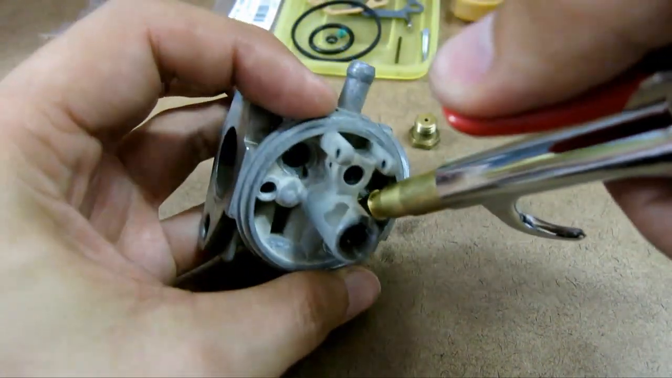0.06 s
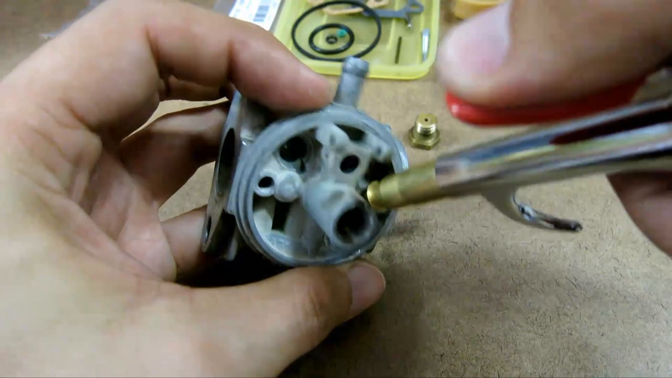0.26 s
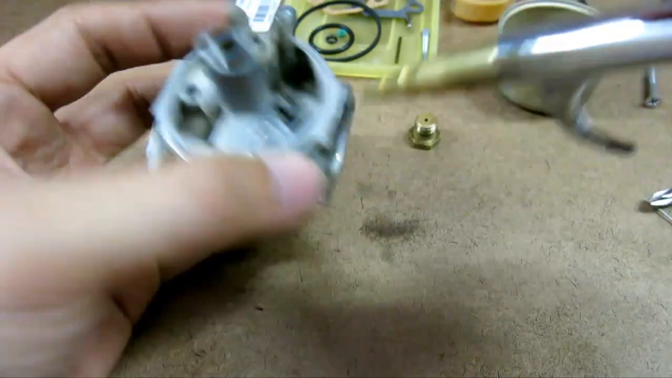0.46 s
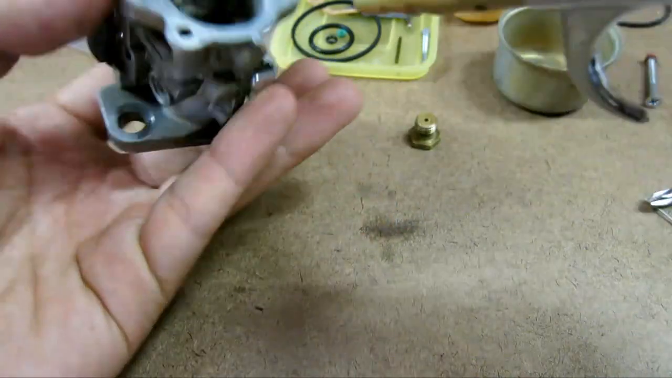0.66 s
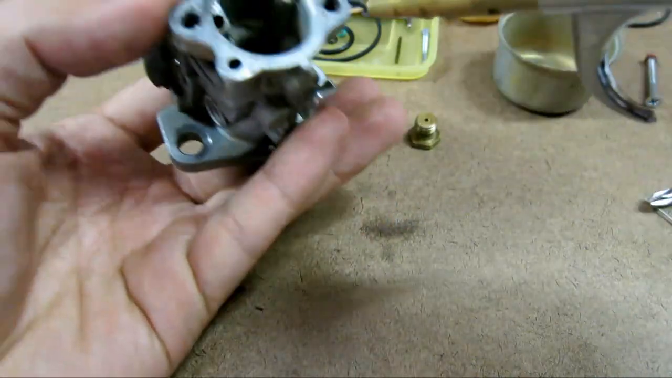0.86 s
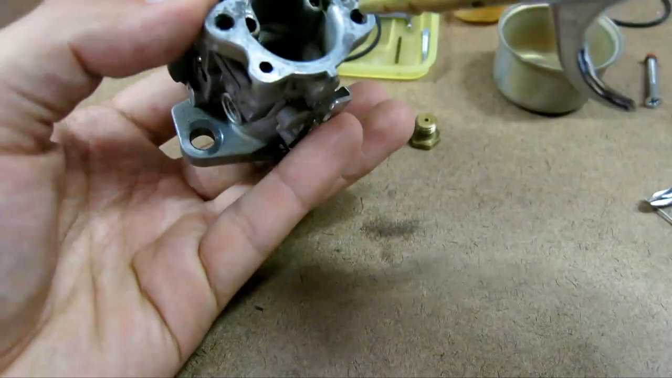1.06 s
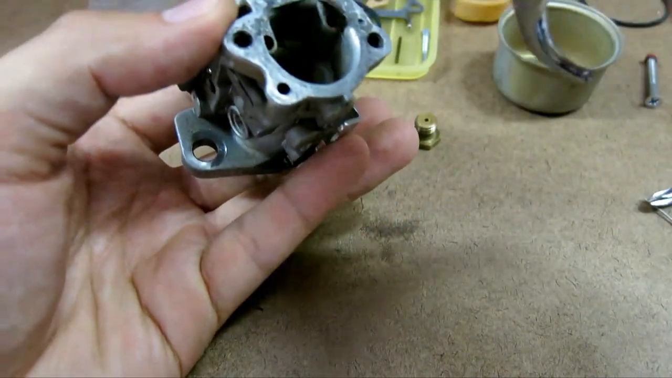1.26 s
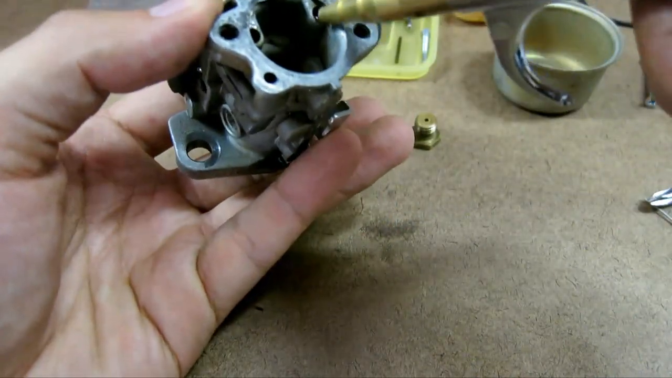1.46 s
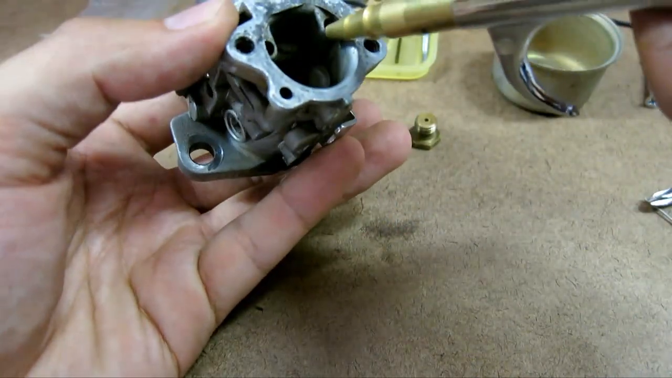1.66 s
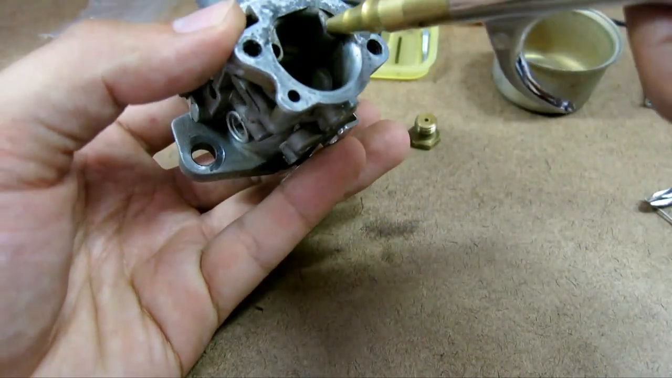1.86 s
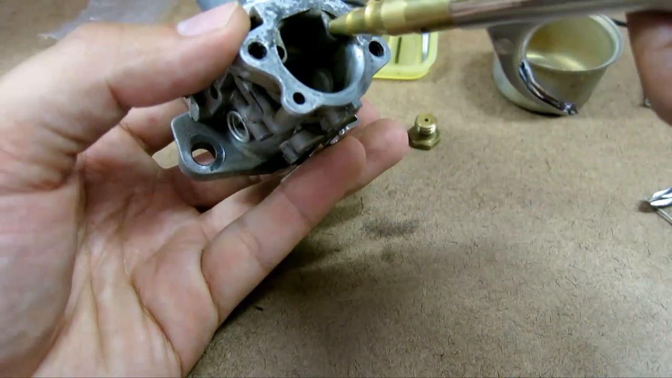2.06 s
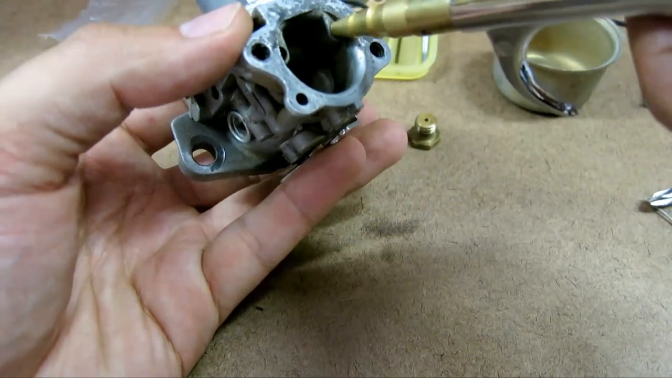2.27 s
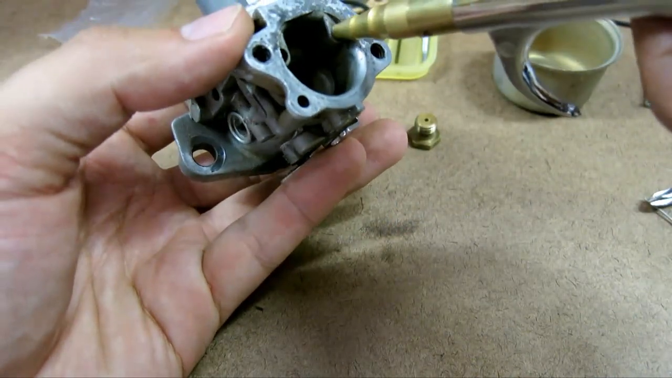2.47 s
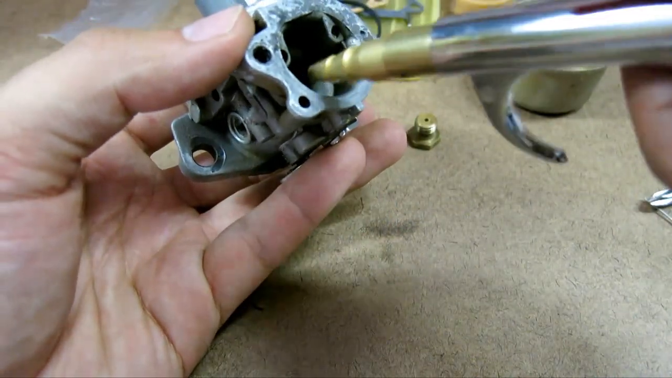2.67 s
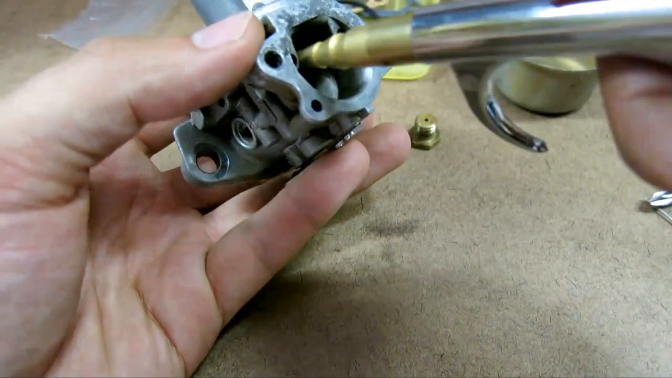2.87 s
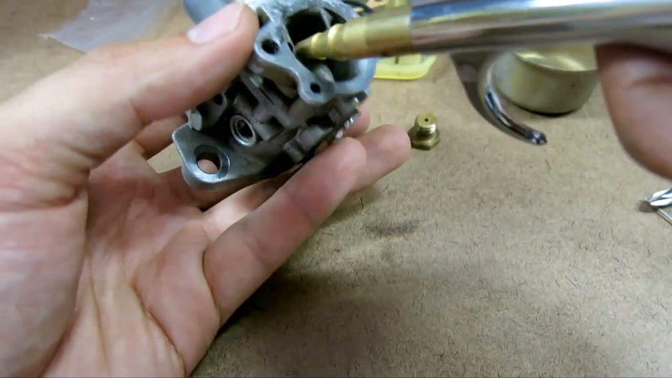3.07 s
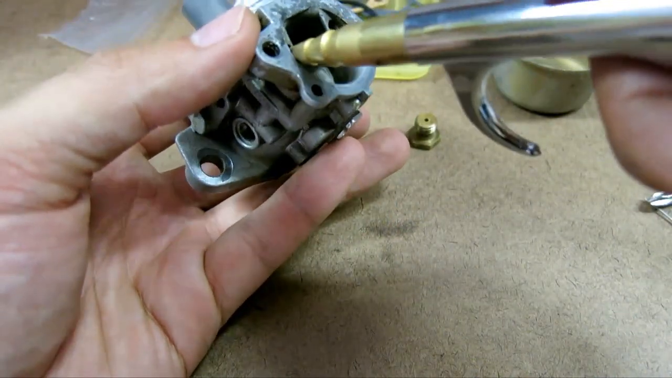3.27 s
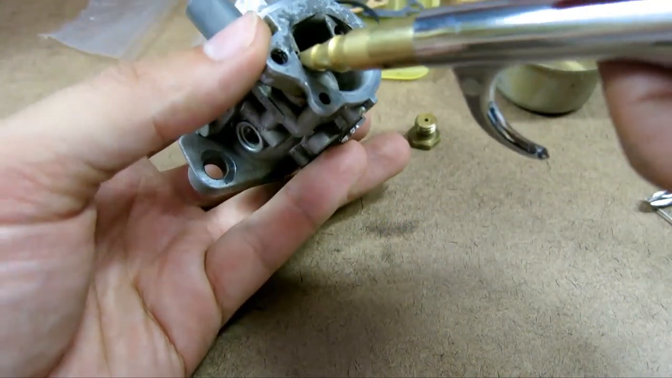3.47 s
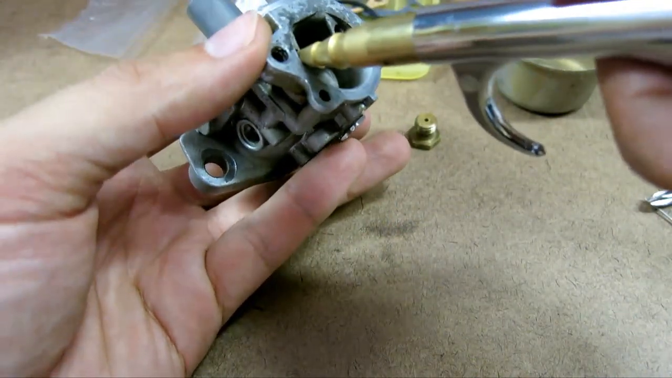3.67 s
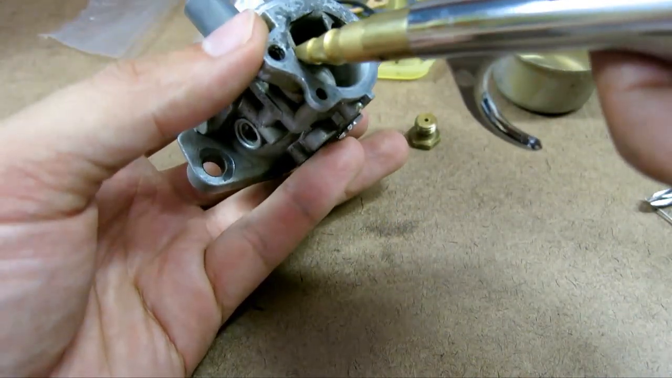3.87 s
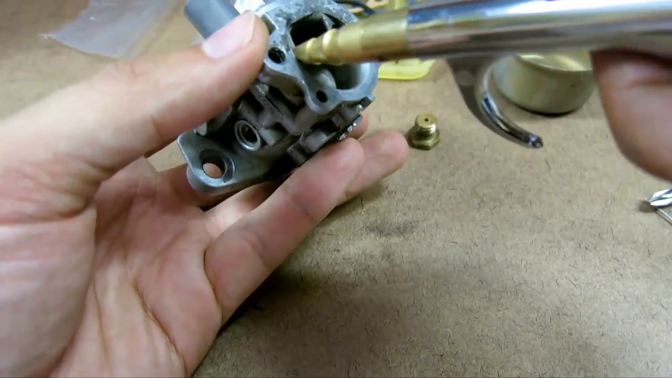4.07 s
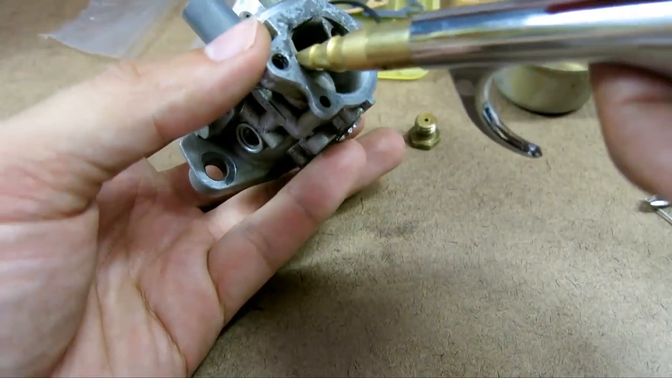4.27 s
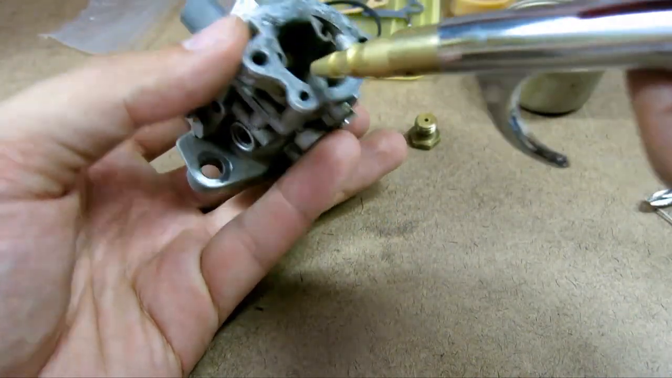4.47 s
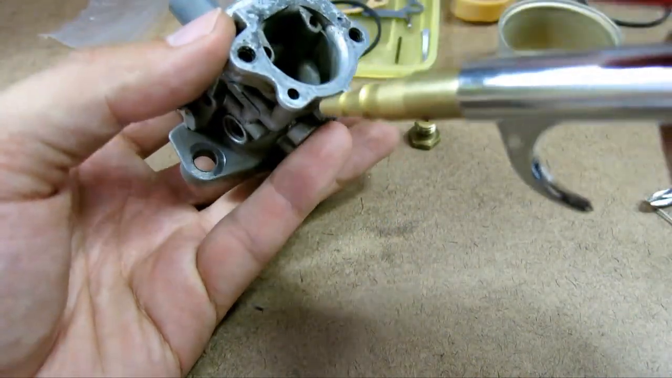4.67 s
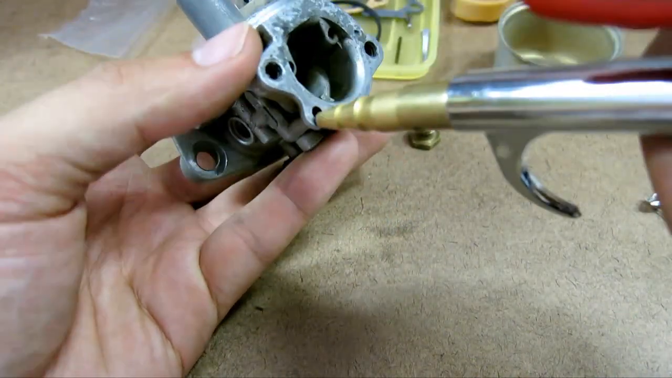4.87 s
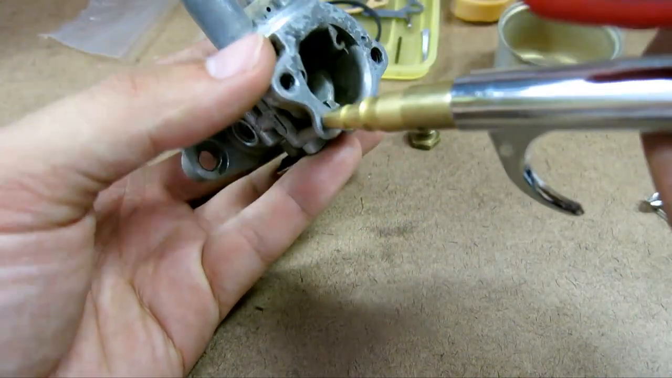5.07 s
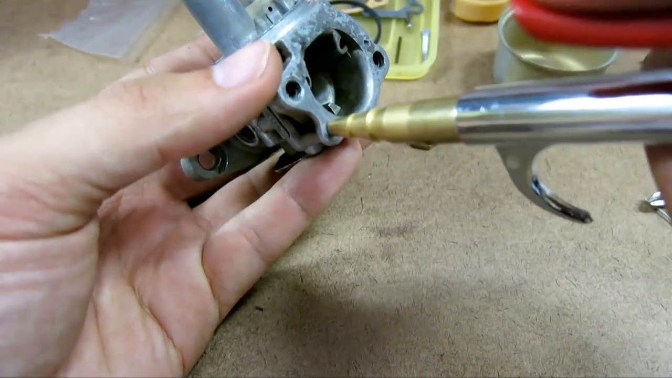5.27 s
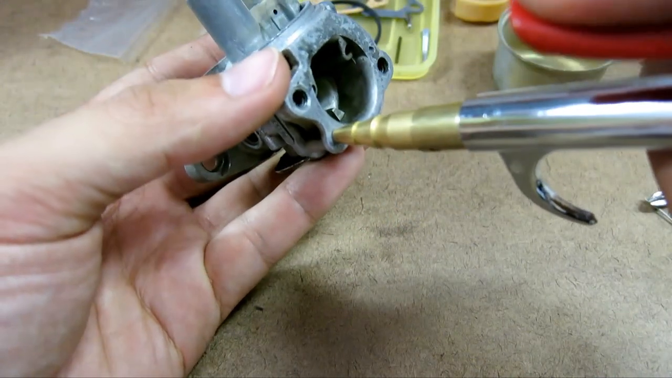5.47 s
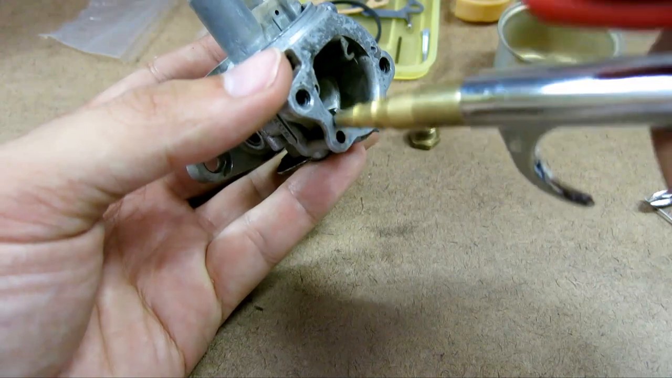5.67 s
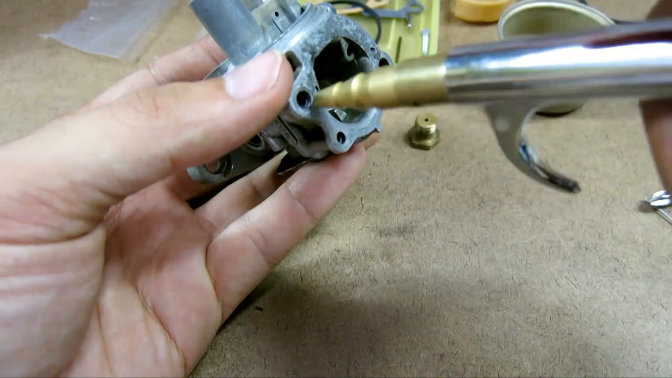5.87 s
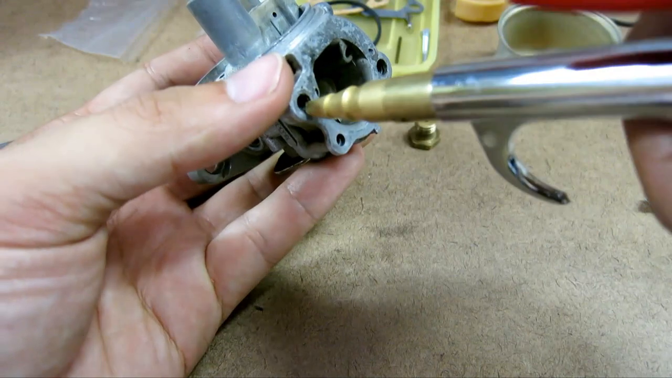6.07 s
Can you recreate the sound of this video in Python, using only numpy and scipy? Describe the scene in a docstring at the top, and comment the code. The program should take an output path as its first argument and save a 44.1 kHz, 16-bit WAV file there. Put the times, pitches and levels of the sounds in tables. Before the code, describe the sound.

An air gun blows out a small metal carburettor close to the microphone, over a faint, low workshop hum. At about 0.1 seconds comes a loud, short hiss with a thump of wind on the microphone. The part knocks softly in the hand around 0.6 and 1 second, and the brass nozzle ticks on it near 1.4 seconds. From 1.7 to 2.5 seconds there are four quick puffs, thin and slightly whistling, the last one stronger. A bright, high ping follows at 2.5 seconds, then faint taps and scrapes around 3 seconds. Three sharp blasts sound between 3.5 and 4.1 seconds, the third buffeting the microphone. The tip clicks at 4.4 seconds and taps lightly around 5. A soft puff at 5.3 seconds leads into a strong, gusty blast at 5.5, and small ticks close the sound near 6 seconds.

```python
"""An air gun blows out a small cast carburettor in short blasts, close to the microphone over a workbench.
At low flow the nozzle tube rings; at full flow the jet hisses in the casting and its draught buffets
the microphone. Between blasts the brass tip ticks and pings on the metal; the part knocks in the hand.
The workshop hums, and the recorder's gain control ducks under loud blasts and slowly recovers."""
import sys
import numpy as np
from scipy import signal
from scipy.fft import rfft, irfft, next_fast_len
from scipy.io import wavfile
from scipy.ndimage import uniform_filter1d, map_coordinates

SR = 44100
rng = np.random.default_rng(int(sys.argv[2]) if len(sys.argv) > 2 else 0)


def master_out(mix):
    """Clip the mix to full scale and print it as 16-bit PCM to the path in sys.argv[1]."""
    frames = np.transpose(np.atleast_2d(mix))
    ceiling = np.clip(frames, -1, 1)
    pcm = np.round(ceiling * 32767).astype(np.int16)
    wavfile.write(sys.argv[1], SR, pcm)


N = 269892

# Trigger pulls. Each row: place aimed at, start and length in seconds, depth from 0 to 1,
# squeeze and release in seconds, relative level of the air spilling round the part in dB.
TRIGGER_PULLS = [("bowl", .089, .193, .88, .114, .04, 10), ("bore", 1.676, .075, .125, .03, .02, -10),
                 ("bore", 1.722, .108, .46, .04, .055, -10), ("bore", 1.939, .165, .56, .075, .075, -7),
                 ("bore", 2.126, .182, .525, .062, .09, -4), ("bore", 2.312, .158, .82, .074, .052, -7),
                 ("passage", 3.493, .169, .83, .061, .082, -4),
                 ("passage", 3.724, .175, .81, .072, .088, -4),
                 ("passage", 3.932, .203, .89, .095, .068, 0), ("rim", 5.296, .163, .615, .072, .09, 0),
                 ("rim", 5.493, .17, .9, .088, .06, 5)]
# Stereo image of the hisses and scrapes. Each row: frequency in Hz, left-right coherence.
HISS_COHERENCE = [(300, .7), (2500, .96), (8500, .97), (10500, .88), (15000, .82)]


def amp(db):
    return 10 ** (np.asarray(db) / 20)


def unit(x):
    return x / np.sqrt(np.mean(x ** 2) + 1e-20)


def along(points, hz):
    """Read (Hz, value) points on a log axis."""
    f, v = np.transpose(points)
    return np.interp(np.log(hz + 1), np.log(f + 1), v)


def eq(points):
    """A gain curve through (Hz, dB) points."""
    return lambda hz: amp(along(points, hz))


def wobble(rate):
    """A smooth random curve, rate knots a second."""
    return map_coordinates(rng.standard_normal(int(N * rate / SR) + 4), [np.arange(N) * rate / SR])


def filtered(x, response):
    """Shape x with a frequency response."""
    n = x.shape[-1]
    m = next_fast_len(n + SR // 4)
    return irfft(rfft(x, m) * response(np.fft.rfftfreq(m, 1 / SR)), m)[..., :n]


def noise(gain, coherence=HISS_COHERENCE, size=N):
    """Stereo noise of rms 1 with a given colour and width."""
    def mid_side(hz):
        angle = np.arccos(np.clip(along(coherence, hz), -.995, .995)) / 2
        return gain(hz) * [np.cos(angle), np.sin(angle)]
    mid, side = filtered(rng.standard_normal((2, size)), mid_side)
    return unit(np.array([mid + side, mid - side]))


def bell(hz, centre, width):
    """A bell curve of height 1 around a centre frequency."""
    return 1 / (1 + (2 * (hz - centre) / width) ** 2)


def add(track, start, sound):
    """Lay a sound into a track, start seconds in."""
    part = track[round(start * SR):][:len(sound)]
    part += sound[:len(part)]


def workshop(rumble_db=-55, hum_boost_db=6, drift_rad=0.45, hiss_db=-76):
    """Mains and a motor hum a little unsteadily over dull room tone and a faint hiss."""
    # Hum tones. Each row: frequency in Hz, relative level in dB.
    hum_tones = [(59.2, -81), (119, -69.2), (156.1, -74.5), (209.9, -78.5), (646.0, -80.5)]
    # Colours of the room tone and the hiss. Each row: frequency in Hz, gain in dB.
    rumble_colour = [(25, -38), (40, -20), (52, -8.5), (68, -9.5), (88, -14.5), (110, -4.5), (170, -7.5),
                     (280, -12.5), (400, -12.5), (650, -16.5), (1050, -19.5), (1700, -26), (3500, -44),
                     (5000, -70)]
    hiss_colour = [(3500, -2), (8000, 0), (12000, -5), (15000, -15)]
    # Stereo image of the room tone. Each row: frequency in Hz, left-right coherence.
    rumble_coherence = [(60, -0.6), (180, -0.37), (550, -0.69), (1650, -0.8), (4970, 0.59), (15000, 0.36)]
    t = np.arange(N) / SR
    hum = sum(amp(db + hum_boost_db) * np.sqrt(2) * np.sin(2 * np.pi * hz * t + drift_rad * wobble(5.5))
              for hz, db in hum_tones)
    rumble = amp(rumble_db) * noise(eq(rumble_colour), rumble_coherence)
    return hum + rumble + amp(hiss_db) * noise(eq(hiss_colour))


def valve_flow(pull):
    """The finger squeezes and lets go; the valve cracks open, holds a small flow, then opens fully."""
    # Valve response. Each row: trigger depth from 0 to 1, flow in dB.
    opening = [(0, -75), (.135, -50), (.315, -32), (.5, -27), (.72, -13), (.9, -7.5), (1, -6)]
    _, start, length, depth, squeeze, release, _ = pull
    t = np.arange(N) / SR - start
    ease = lambda u: np.sin(np.pi / 2 * np.clip(u, 0, 1))
    travel = depth * ease(t / squeeze) * ease((length - t) / release)
    return (travel > 0) * amp(np.interp(travel, *np.transpose(opening)))


def air_flow(place=None):
    """Strength of the stream aimed at one place, or at all of them."""
    return sum(valve_flow(pull) for pull in TRIGGER_PULLS if place in (None, pull[0]))


def blasts(place, tube, hiss, contour, knee_db, blend_db=3, sputter_db=2.1, churn_db=1.03, broaden=1.6):
    """A gentle flow sounds the nozzle tube; past the knee it turns into a broad turbulent hiss."""
    stream = air_flow(place)
    jet_share = 1 / (1 + np.exp((knee_db - 20 * np.log10(stream + 1e-6)) / blend_db))
    overtones = lambda hz: sum(amp(db) * bell(hz, centre, broaden * width) ** 2
                               for centre, width, db in tube)
    piping = noise(lambda hz: overtones(hz) + amp(-33) * (hz > 350))  # overtones on a breathy floor
    piping = unit(piping * amp(sputter_db * wobble(260)))  # the half-open valve sputters
    contour_db = lambda hz: sum(db * bell(hz, centre, width) for centre, width, db in contour)
    jet = noise(lambda hz: amp(along(hiss, hz) + contour_db(hz)))
    jet = unit(jet * amp(churn_db * wobble(400)))
    return stream * (np.sqrt(1 - jet_share) * piping + np.sqrt(jet_share) * jet)


def air_gun():
    """The gun is aimed at the float bowl, the bore, a small passage and the rim."""
    # Nozzle tube overtones, shifted by what lies before its mouth.
    # Each row: frequency in Hz, width in Hz before broadening, relative level in dB.
    tube_bowl = [(600, 400, -13.5), (2780, 1300, -9), (5200, 500, 2), (5900, 550, -1), (7750, 720, -3.5),
                 (10200, 610, -1), (12700, 800, 3.5), (15500, 600, -6.5)]
    tube_bore = [(600, 310, -27), (2476, 830, -9.5), (3380, 300, -21), (5200, 620, -8.5),
                 (6050, 500, -11.5), (7700, 609, -16), (10010, 580, 2), (12100, 600, -1.5),
                 (12950, 600, -0.5), (15380, 560, -4.5)]
    tube_passage = [(620, 340, -21), (2700, 1030, -12), (5250, 1000, -8), (7890, 500, -12.5),
                    (10440, 940, 0.5), (12800, 610, 1.5), (15120, 800, -19.5)]
    tube_rim = [(620, 340, -24), (2500, 850, -13.5), (5000, 1530, -8), (6600, 600, -13.5), (7900, 400, -5),
                (9300, 500, -13.5), (10600, 500, -16.5), (12440, 880, 0), (15520, 450, -4)]
    # Colour of the jet. Each row: frequency in Hz, gain in dB.
    hiss_bowl = [(100, -22.5), (500, -12.5), (2500, -12), (3800, -7), (5200, -3), (7000, -3.5), (8800, 2.5),
                 (11000, -2), (13000, 3.5), (15000, -2.5), (16000, -9.5)]
    hiss_bore = [(100, -29.5), (600, -27), (1500, -20.5), (2600, -16), (4000, -17.5), (5300, -6),
                 (6600, -12.5), (9000, -12), (10300, -11), (11000, -4.5), (12200, -0.5), (14500, -6.5),
                 (15700, -9.5)]
    hiss_passage = [(100, -42), (600, -32), (1500, -21.5), (2700, -13), (3800, -20.5), (4900, -7),
                    (7000, -9), (9000, -10.5), (10600, 1.5), (11700, -5.5), (14500, 1), (15800, -9.5)]
    hiss_rim = [(100, -39.5), (600, -26.5), (1500, -33), (2500, -17.5), (3600, -13), (4900, -8),
                (6000, -7.5), (7800, -3), (10000, -5), (12400, 1), (14300, -3.5), (15600, -13.5)]
    # Peaks and dips laid over the hiss. Each row: frequency and width in Hz, gain in dB.
    contour_bowl = [(8700, 440, 3), (10000, 500, 3), (14400, 500, 1.5)]
    contour_bore = [(7550, 530, 9), (11950, 300, 2), (10500, 525, 6), (6450, 400, -4), (3900, 500, -5),
                    (11280, 400, -6), (15350, 500, 5)]
    contour_passage = [(10920, 400, 7), (12750, 900, 4.5), (13900, 400, -4), (15400, 400, 3)]
    contour_rim = [(4950, 300, 2), (12000, 360, 1), (10980, 300, 4), (14700, 400, -4), (15300, 600, 6)]
    return (blasts("bowl", tube_bowl, hiss_bowl, contour_bowl, knee_db=-22)
            + blasts("bore", tube_bore, hiss_bore, contour_bore, knee_db=-21.5)
            + blasts("passage", tube_passage, hiss_passage, contour_passage, knee_db=-22)
            + blasts("rim", tube_rim, hiss_rim, contour_rim, knee_db=-21))


def spits():
    """The jet spits a short, bright edge tone as it catches the lip of a hole."""
    # Spits. Each row: centre in seconds, half-width in seconds, level in dB.
    bursts = [(0.148, 0.009, -16), (3.537, 0.0097, -22)]
    # Colour of the edge tone. Each row: frequency in Hz, gain in dB.
    colour = [(2500, -24.5), (4400, -9.5), (5300, 1), (6300, -8), (9000, -22.5)]
    t = np.arange(N) / SR
    level = sum(amp(db) * np.exp(-((t - centre) / width) ** 2) for centre, width, db in bursts)
    return level * noise(eq(colour))


def draught(edge_s=0.0036, lumps_db=0.9, low_cut_hz=330, heavy_db=-10):
    """Deflected air sweeps the microphone ports and pushes them in opposite phase."""
    # Gusts. Each row: start in seconds, end in seconds, level against the air flow in dB.
    gusts = [(0.156, 0.25, 7), (2.382, 2.432, -10.5), (3.545, 3.592, -12), (3.784, 3.841, -22.5),
             (4.007, 4.077, -4.5), (5.558, 5.619, -4)]
    # Colour of the buffeting. Each row: frequency in Hz, gain in dB.
    colour = [(25, -18), (100, -2.5), (350, 1), (1200, -3.5), (2100, -10), (3300, -19), (5000, -30.5),
              (9000, -50)]
    t = np.arange(N) / SR
    gate = lambda start, end: (np.tanh((t - start) / edge_s) - np.tanh((t - end) / edge_s)) / 2
    push = air_flow() * sum(amp(db) * gate(start, end) for start, end, db in gusts)
    eddies = noise(eq(colour), coherence=[(100, -0.93), (1200, -0.93), (3000, -0.64)])
    eddies = unit(np.tanh(eddies * amp(lumps_db * wobble(170)) / 2))
    small_eddies = filtered(eddies, lambda hz: hz ** 2 / (hz ** 2 + low_cut_hz ** 2))
    heavy = push / (push + amp(heavy_db))  # only a strong draught carries large, low eddies
    return push * (heavy * eddies + (1 - heavy) * small_eddies)


def strike(modes, colour, crack_db, crack_t60, scatter_db, attack_s):
    """One contact of peak 1: a brief crack, and the modes rung at random strengths."""
    t = np.arange(SR // 4) / SR
    ring = sum(amp(db + rng.normal(0, scatter_db) - 60 * t / t60)
               * np.sin(2 * np.pi * (hz * t + rng.random())) for hz, db, t60 in modes)
    crack = unit(filtered(rng.standard_normal(len(t)), eq(colour)))
    hit = (ring + crack * amp(crack_db - 60 * t / crack_t60)) * (1 - np.exp(-t / attack_s))
    return hit / np.abs(hit).max()


def knocks():
    """The part knocks softly as it is turned in the hand."""
    # Knocks. Each row: start in seconds, relative peak in dB.
    hits = [(0.556, -49), (0.628, -43), (0.645, -41), (1.042, -44.5), (4.563, -53)]
    # Modes of the held casting. Each row: frequency in Hz, level in dB, T60 in seconds.
    modes = [(790, -6, .04), (910, 4, .04), (1355, 3, 0.048), (2160, -15, 0.058)]
    # Colour of the thud. Each row: frequency in Hz, gain in dB.
    thud = [(300, 6), (1400, -2), (3000, -16), (6000, -30)]
    track = np.zeros(N)
    for start, db in hits:
        knock = strike(modes, thud, crack_db=4, crack_t60=0.035, scatter_db=5.5, attack_s=0.0028)
        add(track, start, amp(db + 1) * knock)
    return track


def scrapes(grit_db=4):
    """Fingers and tip slide on the metal, catching and slipping in uneven grains."""
    # Slides. Each row: start in seconds, end in seconds, level in dB.
    slides = [(1.339, 1.521, -70), (2.915, 2.954, -68), (3.031, 3.1, -58.5), (6.014, 6.042, -63)]
    # Colour of the friction. Each row: frequency in Hz, gain in dB.
    colour = [(800, -10), (1900, -1), (3000, -0.5), (4900, -0.5), (6200, -11.5), (15000, -23)]
    t = np.arange(N) / SR
    arch = lambda start, end: np.sqrt(np.clip(4 * (t - start) * (end - t) / (end - start) ** 2, 0, 1))
    level = sum(amp(db) * arch(start, end) for start, end, db in slides)
    return level * unit(amp(grit_db * wobble(300)) * noise(eq(colour)))


def ticks(rise_s=0.0015, ring_db=-21, ring_t60=0.12):
    """The tip skids on the casting: a few milliseconds of grit, damped at once by the hand."""
    # Skids. Each row: start in seconds, peak in dB.
    skids = [(1.3468, -41), (1.38, -42), (1.3948, -42), (1.4018, -28), (1.5264, -30), (4.4055, -40),
             (4.417, -27.5), (4.825, -45), (5.0722, -46), (5.0875, -48), (5.1427, -53), (5.163, -51),
             (5.173, -54), (5.9898, -37), (6.0327, -45.5)]
    # Colour of the casting. Each row: frequency in Hz, gain in dB.
    colour = [(350, -20), (600, -7), (1130, -8), (2950, -1.5), (3630, -5.5), (5480, -8), (6030, -1.5),
              (7310, 2.5), (8620, -6.5), (10900, -3.5), (12200, -16), (13600, -7), (16000, -21)]
    track, t = np.zeros(N), np.arange(SR // 10) / SR
    envelope = (t / rise_s) ** 2 * np.exp(2 - 2 * t / rise_s) + amp(ring_db - 60 * t / ring_t60)
    for start, db in skids:
        grit = envelope * filtered(rng.standard_normal(len(t)), eq(colour))
        add(track, start, amp(db) * grit / np.abs(grit).max())
    return track


def pings():
    """The brass tip taps the casting and rings."""
    # Taps. Each row: start in seconds, peak in dB, relative strength of the crack in dB.
    taps = [(1.5996, -37, 10.5), (2.5274, -14.5, -16), (2.9078, -30.5, 6), (3.1825, -38, 11),
            (3.2624, -37, 15), (4.817, -36.5, 16), (5.199, -47.5, 16)]
    # Modes of the tip. Each row: frequency in Hz, level in dB, T60 in seconds.
    modes = [(8760, -15, 0.085), (9356, -10, 0.056), (10000, -16, 0.077), (10100, -13, 0.12),
             (10470, -12, 0.066), (11060, 3, 0.077), (13000, -9, 0.077), (14740, -19, 0.094),
             (16200, -10.5, 0.078), (15670, -19.5, 0.092)]
    # Colour of the crack. Each row: frequency in Hz, gain in dB.
    crack = [(300, -20), (1500, -8.5), (3000, -2), (7500, 0), (11000, -0.5), (16000, -11)]
    track = np.zeros(N)
    for start, db, crack_db in taps:
        ping = strike(modes, crack, crack_db + 2, crack_t60=0.013, scatter_db=4.5, attack_s=.0003)
        add(track, start, amp(db) * ping)
    return track


def bench(x, echo_db=-19, count=6):
    """Bench top and hands return weak, early copies that ripple the spectrum."""
    delays_s = rng.uniform(.001, .012, count)
    return x + amp(echo_db) * sum(np.pad(x, ((0, 0), (round(d * SR), 0)))[:, :N] for d in delays_s)


def microphone_ports(x):
    """The left port hears the treble louder and earlier."""
    # Balance. Each row: frequency in Hz, left over right in dB.
    balance = [(4000, -0.5), (8000, 0.3), (11000, 2), (15000, 3.5)]
    # Phase lead of the left port. Each row: frequency in Hz, lead in radians.
    lead = [(8000, 0), (10500, 0.13), (15000, 0.33)]
    lean = lambda hz: amp(along(balance, hz) / 2) * np.exp(.5j * along(lead, hz))
    return filtered(x, lambda hz: np.array([lean(hz), 1 / lean(hz)]))


def spill():
    """Air spilling round the part hisses evenly towards the walls, less coloured than the blast."""
    level = sum(amp(pull[-1]) * valve_flow(pull) for pull in TRIGGER_PULLS)
    return level * noise(lambda hz: hz / (hz + 3000))


def room(x):
    """The workshop walls answer with a tail in which each frequency dies at its own speed."""
    # Decay of the tail. Each row: frequency in Hz, T60 in seconds.
    decay = [(200, 0.35), (2000, 0.44), (5500, .44), (10000, .39), (15000, .35)]
    # Colour of the tail. Each row: frequency in Hz, gain in dB.
    colour = [(200, -4), (1500, -0.5), (3200, -3), (5000, 0.5), (7500, 0), (10500, -2), (13000, -2),
              (15000, -0.5)]
    # Stereo image of the tail. Each row: frequency in Hz, left-right coherence.
    coherence = [(300, -.5), (1400, .3), (3000, .95), (7000, .93), (10000, .6), (15000, .3)]
    hz, t, bands = signal.stft(noise(eq(colour), coherence, size=SR * 2 // 3), SR, nperseg=256)
    tail = signal.istft(bands * amp(-60 * t / along(decay, hz)[:, None]), SR, nperseg=256)[1]
    return signal.fftconvolve(x.mean(0)[None], tail / np.linalg.norm(tail[0]), axes=1)[:, :N]


def scene(room_db=-29, spill_db=3):
    """Gun and part up close, with the workshop around them."""
    air = bench(air_gun() + spits())
    metal = pings() + knocks() + ticks() + scrapes()
    reverb = amp(room_db) * room(air + metal + amp(spill_db) * spill())
    return microphone_ports(air + metal) + reverb + draught() + workshop()


def record(dry, ceiling_db=-18.5, recovery_db_per_s=5.4, rest_cut_db=3.5, sense_s=.013, attack_s=.006):
    """Gain control ducks under a loud blast and creeps back, so the room tone swells in the gaps."""
    power = np.abs(uniform_filter1d(dry.mean(0) ** 2, int(sense_s * SR)))
    excess_db = np.maximum(10 * np.log10(power + 1e-12) - ceiling_db, 0)
    regained_db = recovery_db_per_s * np.arange(N) / SR
    cut_db = np.maximum.accumulate(np.maximum(excess_db + regained_db, rest_cut_db)) - regained_db
    pole = np.exp(-1 / (attack_s * SR))
    cut_db = rest_cut_db + signal.lfilter([1 - pole], [1, -pole], cut_db - rest_cut_db)
    band_limit = lambda hz: np.clip((15850 - hz) / 200 + .5, 0, 1)
    return filtered(dry * amp(-cut_db), band_limit)


dry = scene()
out = record(dry)
master_out(out)
```